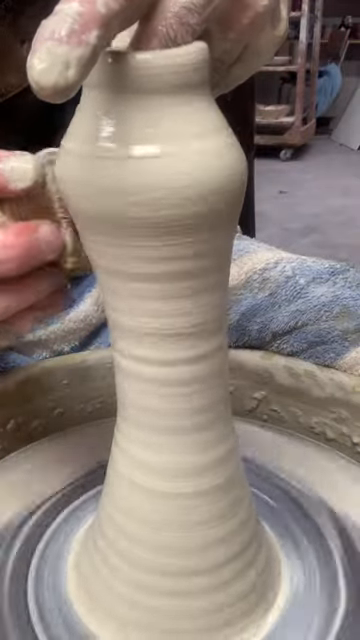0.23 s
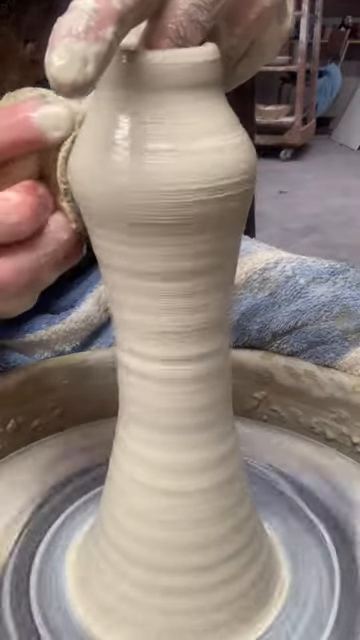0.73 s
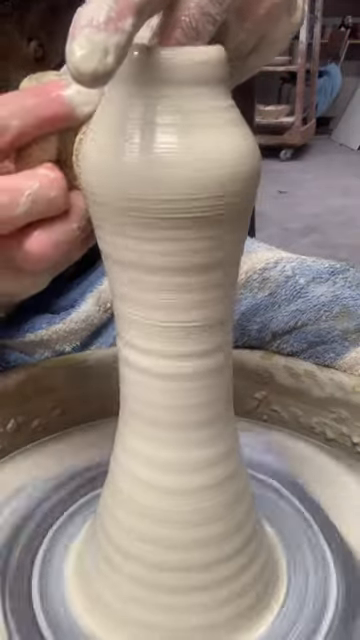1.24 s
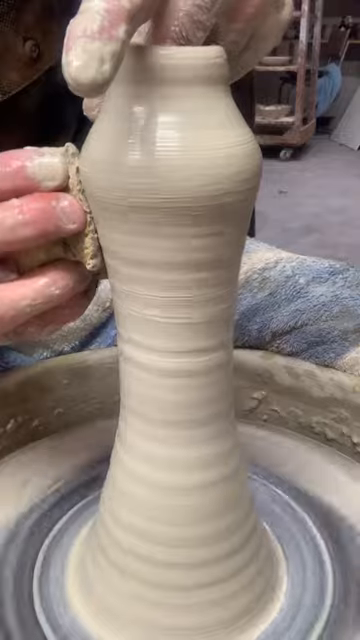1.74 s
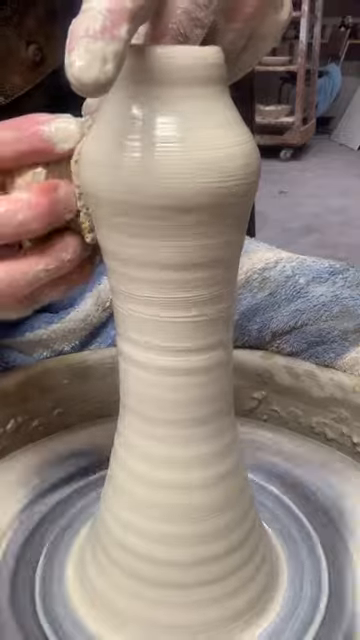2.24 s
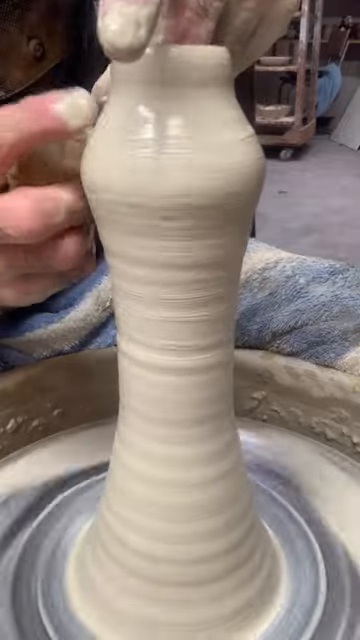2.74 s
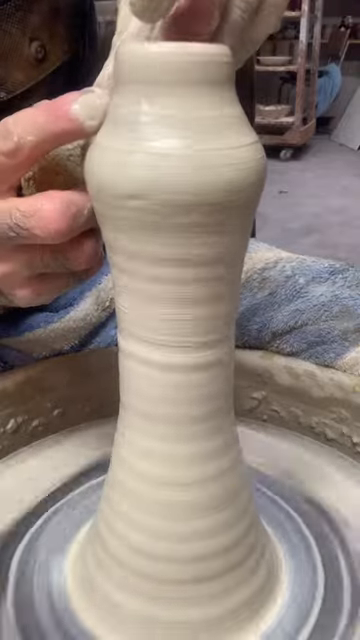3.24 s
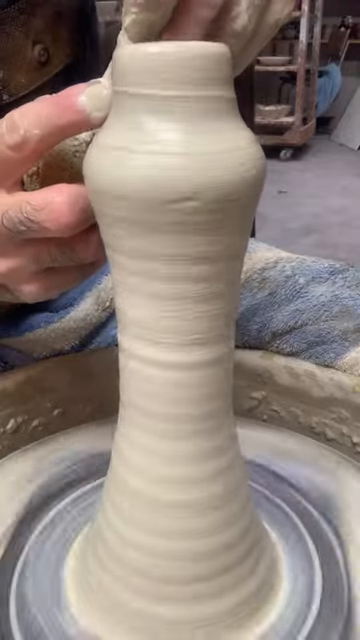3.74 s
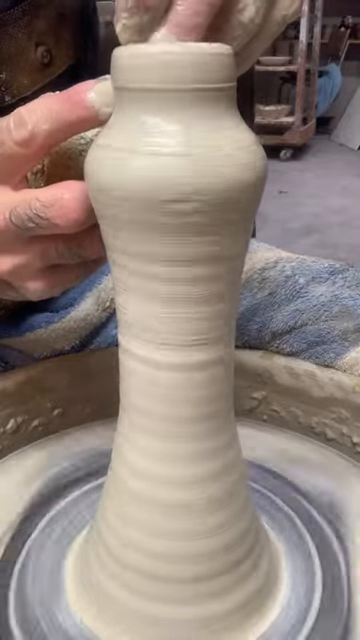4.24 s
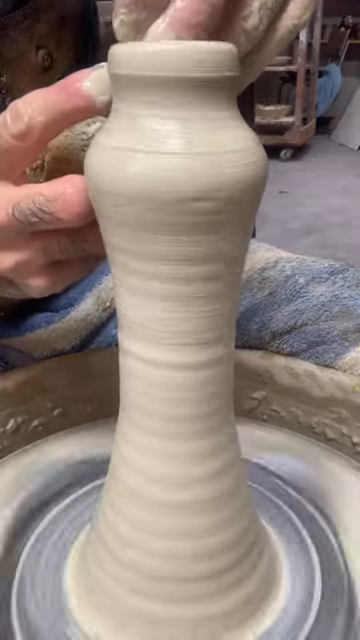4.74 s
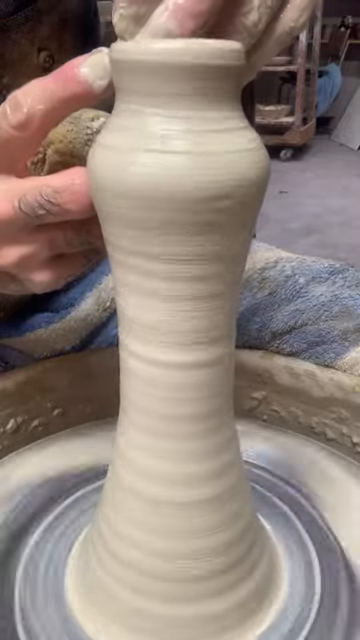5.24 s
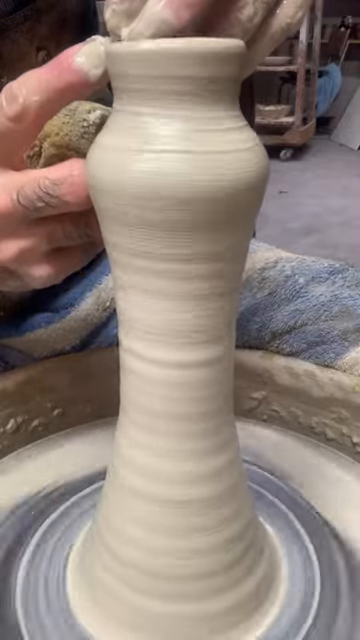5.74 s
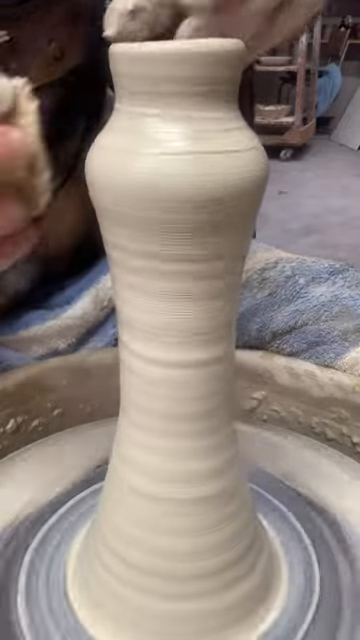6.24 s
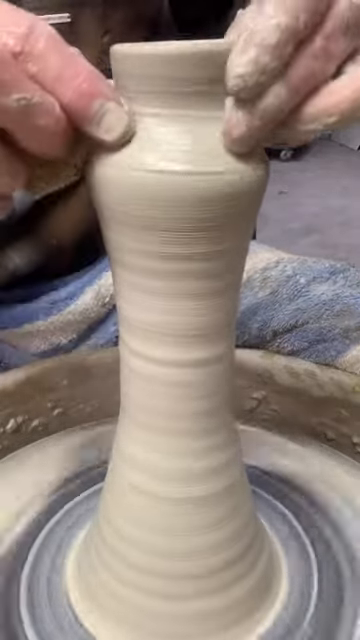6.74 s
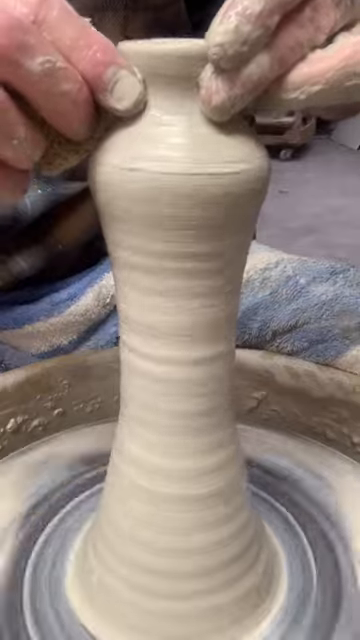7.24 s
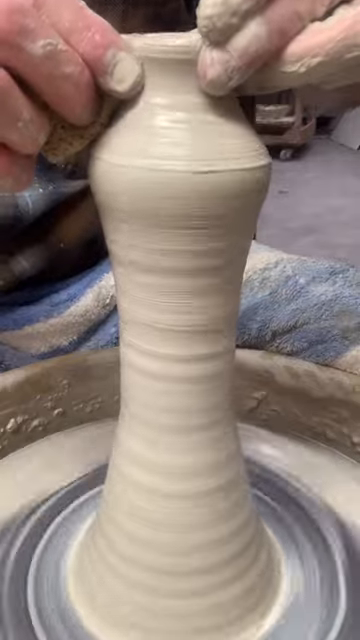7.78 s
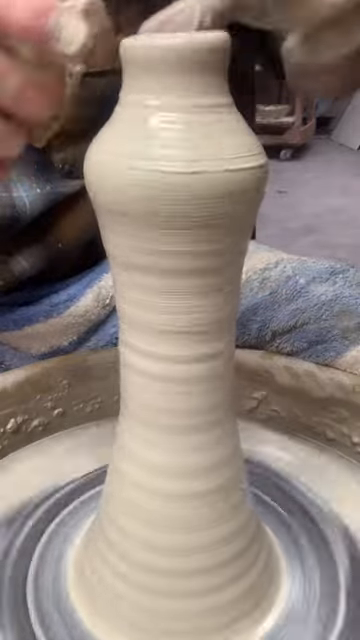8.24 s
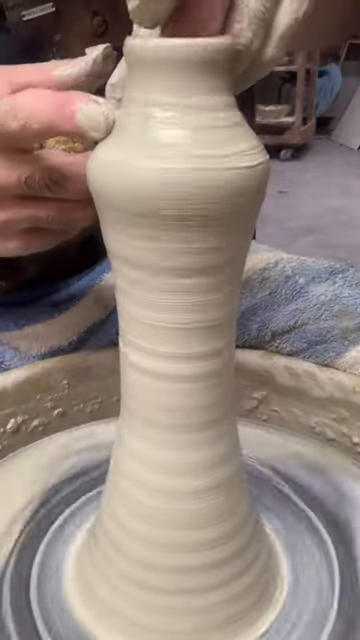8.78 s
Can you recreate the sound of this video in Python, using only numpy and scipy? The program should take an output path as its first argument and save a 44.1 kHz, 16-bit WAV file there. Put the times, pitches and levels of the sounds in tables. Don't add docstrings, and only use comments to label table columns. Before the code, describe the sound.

Close low motor hum with regular dull belt thuds, rocking rumble, thin brushy hiss, soft wet-clay wipes and brief faint squeaks in a studio.

```python
import sys
import numpy as np
from scipy import signal
from scipy.fft import rfft, irfft, next_fast_len
from scipy.io import wavfile
from scipy.ndimage import uniform_filter1d, map_coordinates

SR = 44100
rng = np.random.default_rng(int(sys.argv[2]) if len(sys.argv) > 2 else 0)


def waveform_to_disk(signal):
    frames = np.transpose(np.atleast_2d(signal))
    scaled = np.clip(frames, -1, 1) * 32767
    samples = np.round(scaled).astype(np.int16)
    wavfile.write(sys.argv[1], SR, samples)


def level_to_linear(level):
    exponent = np.asarray(level, float) / 20
    return 10 ** exponent


N = 397341
T = np.arange(N) / SR

HUM_HZ = 119.966
HEAD_TURNS = 7.87
# t/s, knock/dB, frame jolt/dB, dip of second overtone/dB
SLACK_SPOTS = [(0.118, -37, -29, 8), (0.412, -31, -17.5, 5.5), (0.738, -34.5, -19, 6),
               (1.041, -31.5, -21.5, 6.5), (1.381, -32.5, -21.5, 7.5), (1.669, -38, -25.5, 10.5),
               (2.015, -30.5, -24, 10), (2.312, -29.5, -18, 3.5), (2.648, -30, -23, 5.5),
               (2.95, -34, -23, 5), (3.227, -32, -24, 6), (3.572, -34.5, -22.5, 9),
               (3.918, -33, -20.5, 13.5), (4.279, -33.5, -22.5, 3.5), (4.587, -31, -22, 10),
               (4.908, -39.5, -23.5, 9.5), (5.244, -28, -24, 7.5), (5.547, -30, -18.5, 6),
               (5.879, -37, -23, 11.5), (6.21, -31.5, -22.5, 6.5), (6.517, -38.5, -22.5, 8),
               (6.856, -33, -24, 4.5), (7.211, -31, -25, 6.5), (7.51, -32.5, -15.5, 4),
               (7.868, -30.5, -22, 4), (8.172, -34.5, -24, 6.5), (8.49, -38, -23, 7.5),
               (8.815, -31.5, -19, 3.5)]


def hum(shaft):
    overtones = [(1, -18.5, -19, 0.0), (2, -34, -33.5, 0.5), (3, -57, -49, -3.5), (4, -45.5, -42.5, 1.34),
                 (5, -68.5, -58, 2), (6, -50.5, -52, -3.0), (7, -65, -63.5, -2.5), (8, -70.5, -60, 1),
                 (9, -56.5, -56.5, 1.17), (10, -77, -72, -2.3), (11, -84, -77.5, 0), (12, -70, -78.5, 7),
                 (13, -83.5, -79.5, 0.5)]
    side_tones = [(2, 1, -8.5, 2.5), (2, 2, -19, 0.18), (4, -2, -17, 0.38), (4, -1, -13, 1.1),
                  (4, 1, -13, 1.2), (4, 3, -19, 0.35), (7, -1, -13, .9), (10, -1, -2.5, .9)]
    load = hum_load_db(shaft)
    out = np.zeros((2, N))
    for multiple, left_db, right_db, lead in overtones:
        k = round(multiple)
        level_db = load[k] if k in load else 1.3 * wobble(6)
        envelope = level_to_linear(level_db) * np.exp(.06j * wobble(4))
        for near, order, db, loose in side_tones:
            if round(near) == k:
                phase = round(order) * shaft + loose * wobble(4)
                envelope = envelope + level_to_linear(db + 0.28 * wobble(7)) * np.exp(1j * phase)
        tone = envelope * np.exp(2j * np.pi * (k * HUM_HZ * T + rng.random()))
        out += np.sqrt(2) * np.real([level_to_linear(left_db) * tone, level_to_linear(right_db) * np.exp(1j * lead) * tone])
    return out


def hum_load_db(shaft):
    # t/s, hum/dB
    drag = [(0, -20.5), (0.23, -19), (0.98, -17.5), (1.12, -22.0), (1.19, -18.5), (3.85, -18.6),
            (3.92, -24), (4.07, -17.5), (4.25, -19.5), (5.43, -19.7), (5.5, -17.5), (5.9, -17.5),
            (6.63, -21), (6.96, -20), (7.17, -21.5), (7.84, -18.4), (8.1, -21.5), (9.01, -19.5)]
    loop_turns = 12.63
    dip_late_s, dip_s = 0.028, 0.066
    drag_db = curves(drag)[0]
    first_db = drag_db - drag_db.mean()
    first_db = first_db + 0.97 * np.cos(shaft / loop_turns + 3.08)
    first_db = first_db + 1.07 * np.cos(shaft / HEAD_TURNS + 2.16)
    dip_db = np.zeros(N)
    for s, _, _, depth_db in SLACK_SPOTS:
        dip_db += depth_db * np.exp(-((T - s - dip_late_s) / dip_s) ** 2)
    second_db = 2.5 - dip_db + 1.2 * np.cos(shaft / loop_turns + 0.69) + 0.94 * wobble(9)
    fourth_db = .9 - .4 * dip_db + 1.1 * wobble(5.5)
    return {1: eased(first_db + 0.17 * wobble(12)), 2: second_db, 4: fourth_db}


def shaft_angle():
    # t/s, shaft speed/Hz
    speed = [
        (0, 19.95),
        (3.5, 19.95),
        (4.3, 19.1),
        (5.7, 19.1),
        (6.1, 19.3),
        (9.01, 19.3),
    ]
    return 2 * np.pi * (np.cumsum(curves(speed)[0]) / SR - .3)


def rumble(shaft):
    # f/Hz, density/dB per Hz
    rock_spectrum = [(22, -120), (29, -30), (35, -16), (43, -2.5), (50, -6), (61, -8.5), (66, -16.5),
                     (75, -120)]
    # f/Hz, density/dB per Hz
    throb_spectrum = [(55, -57.5), (66, -6.5), (82, 7), (100, 2), (116, 0.5), (128, -7.5), (140, -73.5)]
    # t/s, rumble/dB, throb/dB
    sways = [(.0, -23, -33), (.6, -21.5, -30.5), (.92, -24, -30.5), (1.19, -22.5, -27.5),
             (1.79, -24.5, -31), (1.921, -24.5, -32), (2.2, -26, -27.5), (2.47, -22, -30.5),
             (3.12, -28.5, -28), (3.45, -40.5, -31), (3.77, -24.5, -31.5), (4.099, -26.5, -32),
             (4.39, -26.5, -26.5), (4.78, -33, -32.5), (5.06, -25.5, -32.5), (5.7, -22.5, -26.5),
             (6.1, -28.5, -27.5), (6.4, -23.5, -30), (6.75, -28, -33), (7.06, -22, -36), (7.24, -29.5, -23),
             (7.41, -27, -31.5), (7.681, -24.5, -24), (8.06, -34.5, -26.5), (8.31, -21, -30),
             (8.61, -28.5, -27.5), (8.94, -23.5, -22.5)]
    jolt_late_s = 0.023
    jolt = surges((s + jolt_late_s, db) for s, _, db, _ in SLACK_SPOTS)
    rock_back = surges((s, db) for s, db, _ in sways)
    throb_back = surges((s, db) for s, _, db in sways)
    rock = level_to_linear(-31.5 + 3.3 * wobble(14)) + (jolt + rock_back) * level_to_linear(1.1 * wobble(17))
    throb = level_to_linear(-35 + 1.8 * np.cos(shaft / HEAD_TURNS - 1.05) + 3.3 * wobble(14))
    throb = throb + level_to_linear(-9) * jolt + throb_back
    return driven(rock_spectrum, rock) + driven(throb_spectrum, throb)


def surges(events):
    rise_s = 0.032
    out, u = np.zeros(N + SR), np.arange(SR // 2) / SR / rise_s
    for s, db in events:
        out[round(s * SR):][:len(u)] += level_to_linear(db) * u * np.exp(1 - u)
    return out[:N]


def driven(spectrum, level):
    rock = ports(noise(), spectrum)
    own_power = np.abs(uniform_filter1d(rock[0] ** 2, size=SR // 18))
    own_level = np.sqrt(own_power + 0.024 * np.mean(rock ** 2))
    return eased(level / own_level) * rock * level_to_linear([[.2], [-.2]])


def knocks():
    rebound_s, rebound_db, decay_s, attack_s = .05, -5.5, .11, 0.004
    t = np.arange(SR // 6) / SR
    swell = np.zeros(N + SR)
    for s, db, _, _ in SLACK_SPOTS:
        swell[round(s * SR):][:len(t)] += level_to_linear(db - 60 * t / decay_s) * (1 - np.exp(-t / attack_s))
    swell = swell + level_to_linear(rebound_db) * np.roll(swell, round(rebound_s * SR))
    thud = unit(ports(noise(), [(150, -64.0), (230, -6), (300, 3.5), (400, -9), (550, -18.5), (800, -60.0)]))
    return level_to_linear(3.0) * swell[:N] * thud


def brushes(shaft):
    wiping_db = wipe_db()
    return chirps(shaft) + rattle(shaft) + whistle(shaft, wiping_db) + hiss(shaft, wiping_db)


def chirps(shaft):
    # f/Hz, width/Hz, left/dB per Hz, right/dB per Hz
    housing = [(2320, 55, -86.5, -86.5), (2435, 65, -85, -85), (2540, 60, -94, -94), (2645, 60, -82, -82),
               (2900, 120, -90, -90)]
    # t/s, level/dB
    looseness = [
        (0, -62),
        (2, -63),
        (4.5, -64),
        (5.5, -61),
        (9.01, -60.5),
    ]
    slack_turns = 6.3
    current = 1 + 0.24 * np.cos(4 * np.pi * HUM_HZ * T)
    turn_number = np.round(shaft / (2 * np.pi)).astype(int)
    strike_db = rng.normal(0, 1.6, 200)[turn_number]
    chatter_db = (5 + strike_db) * np.cos(shaft) + 2.6 * np.cos(shaft / slack_turns + .75)
    source = patches(3.2, bins=3, frames=5) * current * level_to_linear(chatter_db)
    level_db = curves(looseness)[0] + 1.7 * wobble(4)
    return level_to_linear(level_db) * unit(ports(source, [(2000, -150)], housing))


def rattle(shaft):
    # f/Hz, density/dB per Hz
    spectrum = [(1400, -130), (1700, -95), (2100, -91.5), (2800, -96.5), (3050, -100), (3400, -103),
                (4500, -102), (5700, -104), (6200, -112), (7000, -130)]
    # f/Hz, width/Hz, left/dB per Hz, right/dB per Hz
    end_cap = [(1860, 82, -83.5, -88.5), (3054, 240, -94.5, -91.5), (3180, 100, -89.5, -89.5),
               (3640, 230, -96, -99), (3770, 260, -96, -100), (4190, 90, -92, -97), (4360, 140, -99, -100)]
    return ports(patches(2.2, bins=2, frames=30) * level_to_linear(0.35 * np.cos(shaft)), spectrum, end_cap)


def whistle(shaft, wiping_db):
    # f/Hz, density/dB per Hz
    spectrum = [(8000, -140), (9300, -110), (10400, -105), (11350, -103), (11450, -115), (11800, -128)]
    # f/Hz, width/Hz, left/dB per Hz, right/dB per Hz
    commutator = [(8670, 110, -102, -102), (9400, 61, -103, -103), (9800, 69, -101, -101),
                  (11000, 120, -103, -103), (11180, 540, -98.5, -98.5)]
    source = patches(2.8, bins=1, frames=300) * unit(level_to_linear(2.3 * np.cos(shaft + 1.9)))
    return ports(source, spectrum, commutator) * level_to_linear(0.26 * wiping_db)


def hiss(shaft, wiping_db):
    # f/Hz, relative density/dB
    spectrum = [(4500, -59), (5600, -5.5), (6500, 3), (7800, -3.5), (9400, -2), (11300, -2.5), (11700, -40)]
    level_db = -76 + wiping_db + .9 * wobble(4.3) + 0.66 * np.cos(shaft + 2.5)
    return level_to_linear(level_db) * unit(ports(patches(2.8, bins=1, frames=300), spectrum))


def wipe_db():
    # t/s, length/s, lift over hiss/dB
    wipes = [(1.02, 2.5, 1), (1.1, .11, 6.5), (1.42, .09, 8), (2.14, .05, 7), (2.38, 0.22, 6.5),
             (2.754, .15, 5), (3.418, .36, 2), (4.63, 0.068, 5), (5.6, 0.089, 5), (6.13, 0.077, 4),
             (6.597, 0.067, 8), (6.83, .04, 4), (7.578, .17, 7), (7.919, .07, 7)]
    edge_s = .04
    lift_db = np.zeros(N)
    for s, length_s, db in wipes:
        inside_s = np.minimum(T - s, s + length_s - T)
        lift_db += db * np.clip(inside_s / edge_s + .5, 0, 1)
    return lift_db


def squeaks():
    # t/s, peak/dB
    squeals = [(0.382, -55), (0.5681, -54), (0.69, -50), (0.7936, -57), (1.1533, -59.5), (1.2575, -60),
               (1.3558, -60), (1.5524, -53.5), (1.644, -52), (2.7143, -53), (3.0619, -59), (3.1128, -60),
               (4.4418, -60), (5.0125, -61), (6.0624, -63), (6.32, -53), (6.5208, -57), (6.73, -60),
               (6.8199, -57), (7.0953, -63), (7.7494, -58), (7.9744, -57), (8.2831, -66), (8.385, -67),
               (8.6995, -59)]
    length_s, gain_db, main_hz, under_hz = .032, 7, 2640, 2435
    out, t = np.zeros((2, N + SR)), np.arange(SR // 10) / SR
    swell = np.sin(np.pi * np.clip(t / length_s, 0, 1)) ** 2
    for s, db in squeals:
        sharp, under = rng.standard_normal(2)
        turn = 2 * np.pi * t * (1 + .005 * sharp)
        tone = np.sin(main_hz * turn + [[0], [2.4]])
        tone = tone + level_to_linear(3 * under - 7) * np.sin(under_hz * turn + [[0], [2.6]])
        out[:, round(s * SR):][:, :len(t)] += level_to_linear(db + gain_db) * swell * tone
    return out[:, :N]


def panels():
    # f/Hz, density/dB per Hz
    drone = [(110, -120), (128, -51.5), (145, -56.5), (165, -59.5), (210, -64.5), (260, -54.5), (330, -75),
             (600, -77.5), (750, -83), (1250, -81.5), (1550, -87), (1750, -93.5), (2000, -120)]
    # f/Hz, width/Hz, left/dB per Hz, right/dB per Hz
    modes = [(153.3, 11, -53, -51), (361, 26, -74.5, -65), (457.8, 42, -67, -58), (483.7, 1.6, -62, -57),
             (537, 16, -74.5, -69), (605, 52, -86.5, -69), (646, 31, -70, -67), (707, 54, -78, -76),
             (912.6, 46, -81.5, -70), (953, 20, -68.5, -76), (1099.4, 15, -68, -71), (1372, 130, -76, -76)]
    return ports(patches(1.4, bins=5, frames=12), drone, modes)


def studio(x, ridge_db, spacing_hz):
    m = next_fast_len(N + 8192)
    hz = np.fft.rfftfreq(m, 1 / SR)
    ridges = map_coordinates(rng.standard_normal(2000), [hz / spacing_hz])
    ridges = ridges * np.clip(hz / 4500, 0, 1)
    return irfft(rfft(x, m) * level_to_linear(ridge_db * ridges), m)[:, :N]


def ports(source, spectrum, resonances=()):
    # f/Hz, left lead/rad
    lead_curve = [(0, 0), (200, -.06), (340, -.5), (660, -2.1), (740, -3.2), (1120, -.9), (1550, -1.9),
                  (1810, -1.4), (2500, -3), (2700, -2.3), (3500, -4.1), (4100, -2.1), (4850, -3.14),
                  (7600, -6.28), (9000, -6.28), (11200, -8.4), (11600, -9.4)]
    # f/Hz, likeness of the ports/0-1
    alike = [(190, 1), (300, .88), (500, .75), (1200, .66), (3000, .66), (5300, .68), (6300, .78),
             (7550, .95), (7650, 1), (8950, 1), (9050, .95), (10000, .86)]
    m = next_fast_len(N + 8192)
    hz = np.fft.rfftfreq(m, 1 / SR)
    power = level_to_linear(2 * along(spectrum, hz)) * np.ones((2, 1))
    for centre, width, left_db, right_db in resonances:
        peak = level_to_linear(2 * np.array([[left_db], [right_db]]))
        power += peak / (1 + (2 * (hz - centre) / width) ** 2) ** 2
    turn = np.arccos(np.clip(along(alike, hz), 0, 1)) / 2
    a, b = rfft(source, m) * [np.cos(turn), np.sin(turn)]
    lead = np.exp(.5j * np.interp(hz, *np.transpose(lead_curve)))
    return irfft(np.sqrt(power * SR / 2) * [(a + b) * lead, (a - b) / lead], m)[:, :N]


def patches(depth_db, bins, frames):
    z = signal.stft(noise(), nperseg=1024, noverlap=768)[2]
    field = uniform_filter1d(rng.standard_normal(z.shape[1:]), bins, axis=0)
    field = uniform_filter1d(field, frames, axis=1)
    z = z * level_to_linear(depth_db * unit(field))
    return unit(signal.istft(z, nperseg=1024, noverlap=768)[1][:, :N])


def noise():
    return rng.standard_normal((2, N))


def unit(x):
    return x / np.sqrt(np.mean(x ** 2) + 1e-20)


def along(points, hz):
    f, v = np.transpose(points)
    return np.interp(np.log(hz + 1), np.log(f + 1), v)


def curves(rows):
    s, *cols = np.transpose(rows)
    return [np.interp(T, s, c) for c in cols]


def wobble(rate_hz):
    coarse_t = T[::64]
    knots = rng.standard_normal(N // 400)
    return np.interp(T, coarse_t, map_coordinates(knots, [coarse_t * rate_hz]))


def eased(x):
    for _ in range(3):
        x = uniform_filter1d(x, size=400)
    return x


def scene():
    shaft = shaft_angle()
    treble = studio(brushes(shaft), ridge_db=2.3, spacing_hz=35)
    return hum(shaft) + rumble(shaft) + knocks() + treble + squeaks() + panels()


def roll_off(x):
    return signal.sosfilt(signal.butter(12, 11730, fs=SR, output="sos"), x)


def record(dry):
    return roll_off(dry)


dry = scene()
out = record(dry)
waveform_to_disk(out)
```